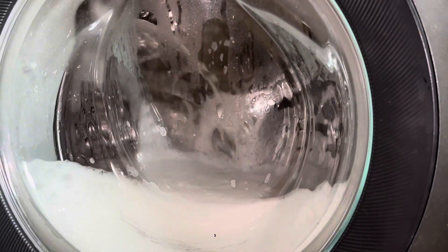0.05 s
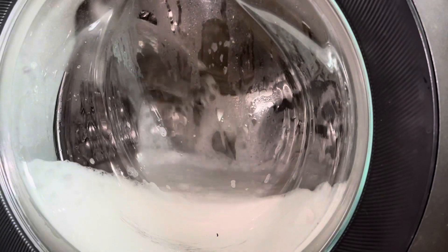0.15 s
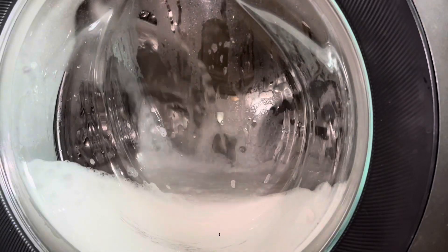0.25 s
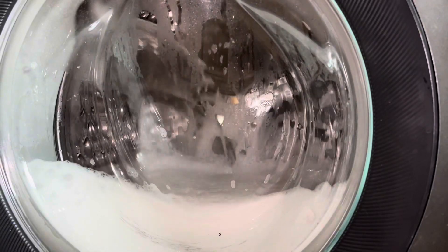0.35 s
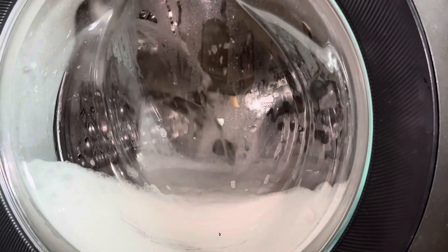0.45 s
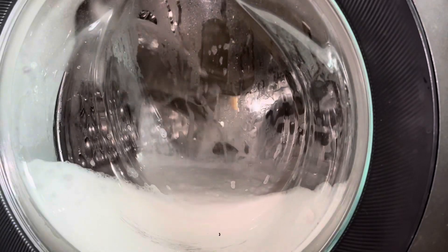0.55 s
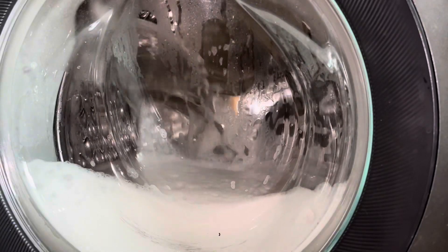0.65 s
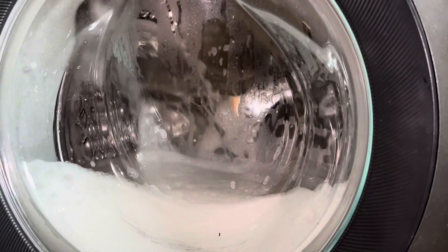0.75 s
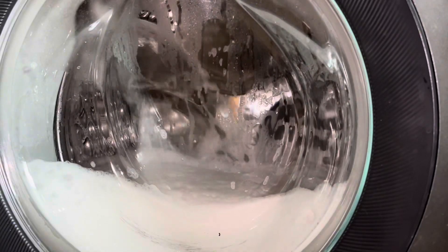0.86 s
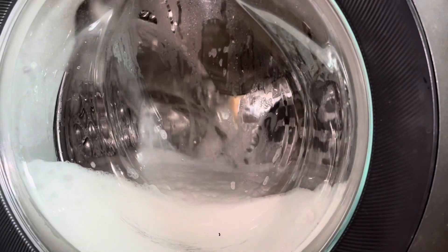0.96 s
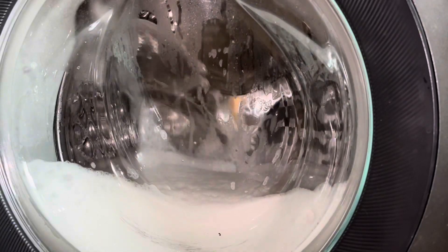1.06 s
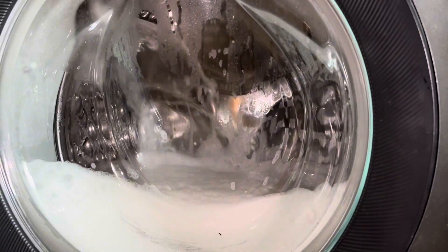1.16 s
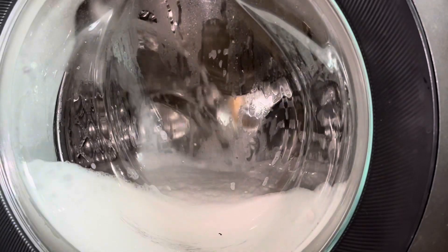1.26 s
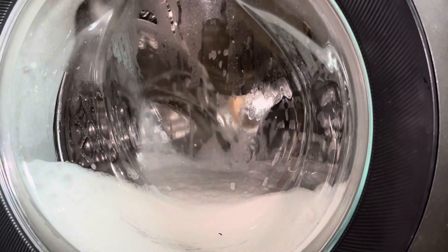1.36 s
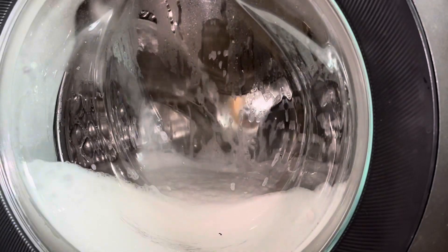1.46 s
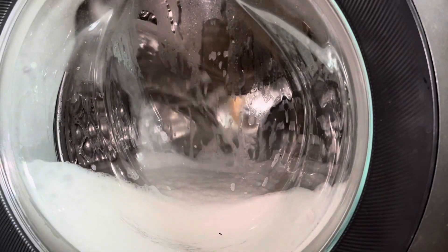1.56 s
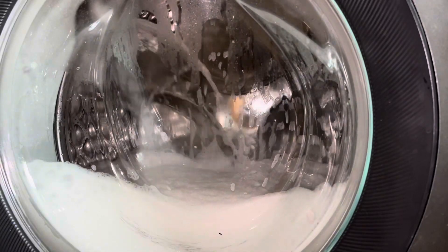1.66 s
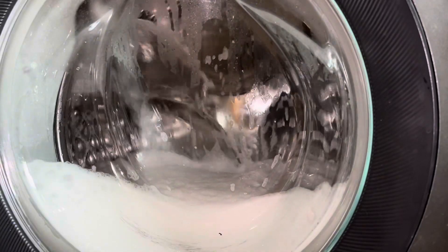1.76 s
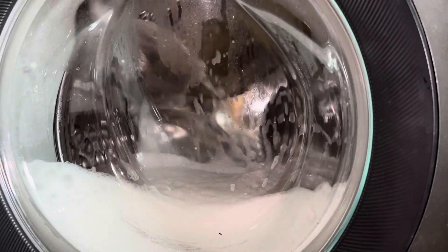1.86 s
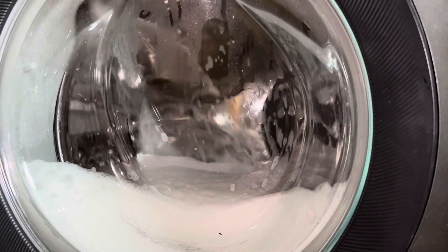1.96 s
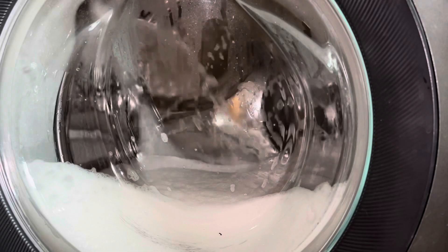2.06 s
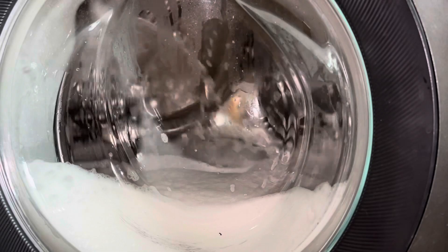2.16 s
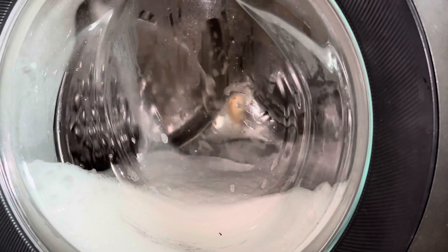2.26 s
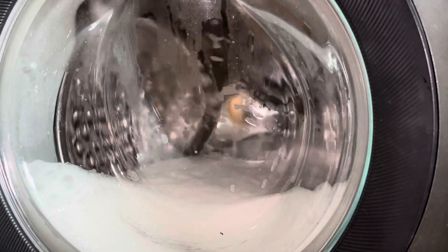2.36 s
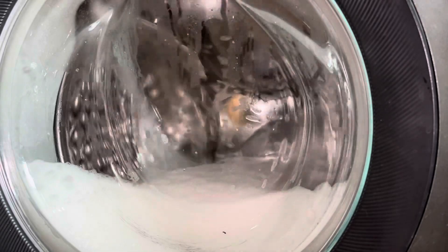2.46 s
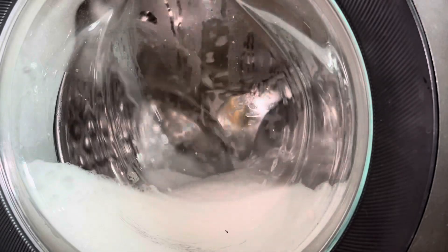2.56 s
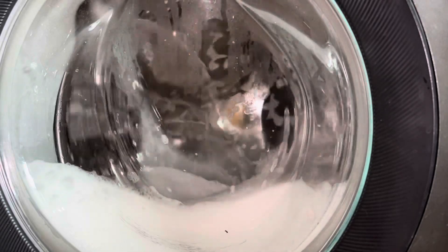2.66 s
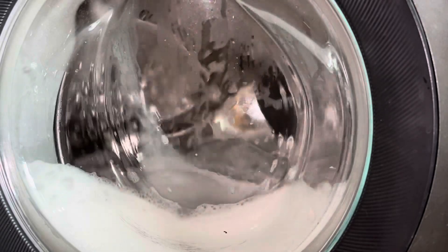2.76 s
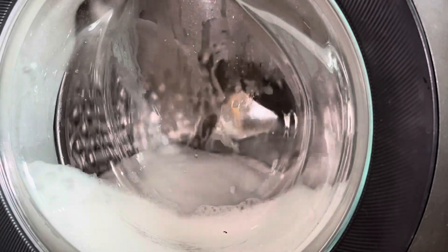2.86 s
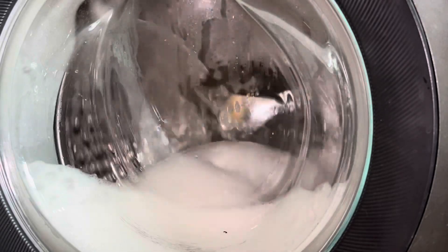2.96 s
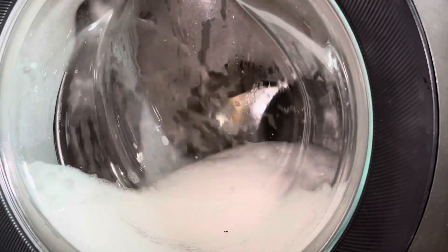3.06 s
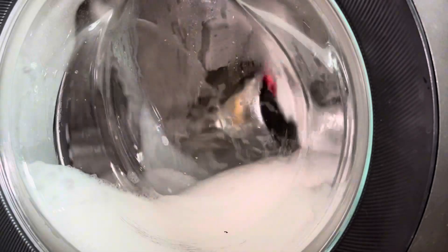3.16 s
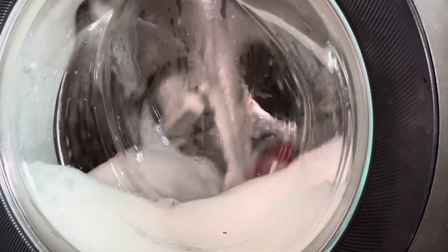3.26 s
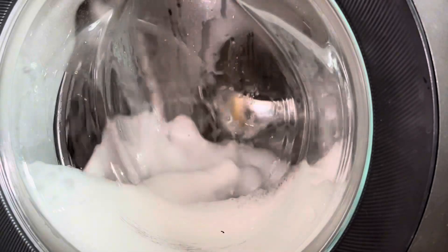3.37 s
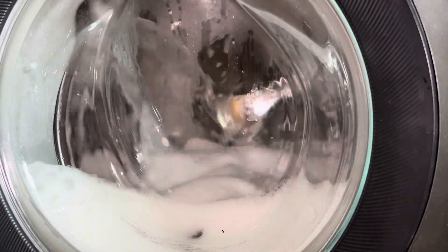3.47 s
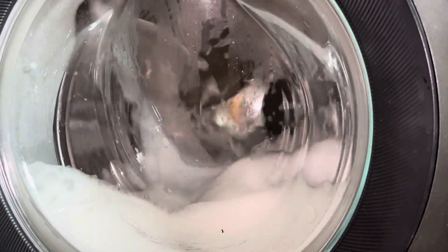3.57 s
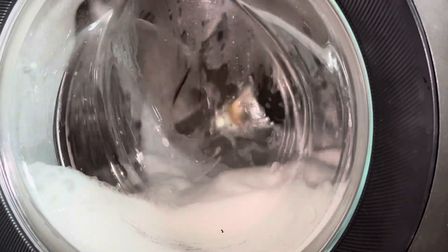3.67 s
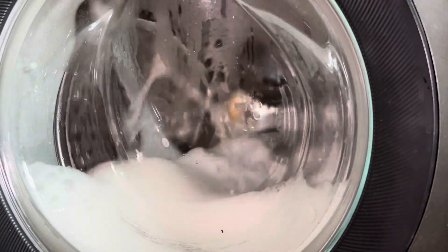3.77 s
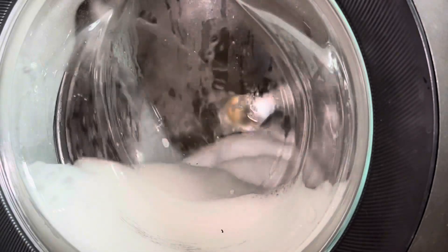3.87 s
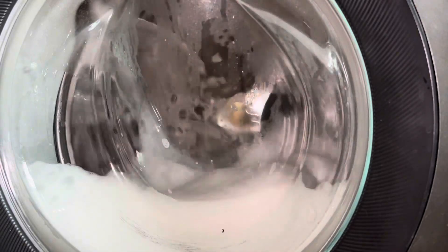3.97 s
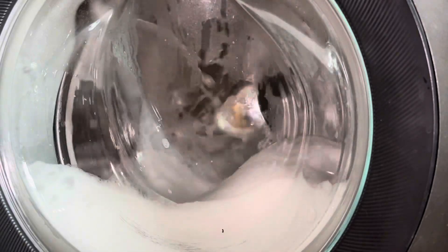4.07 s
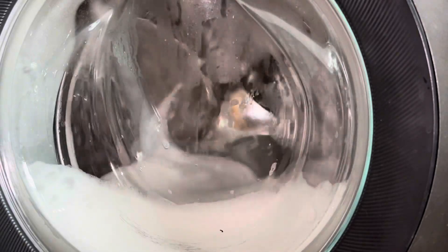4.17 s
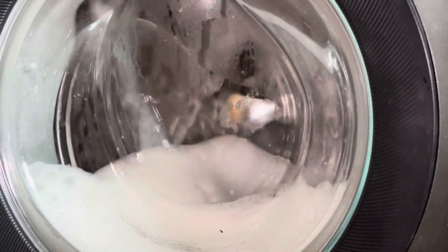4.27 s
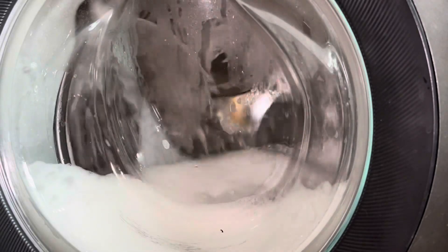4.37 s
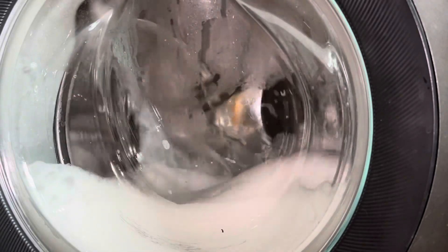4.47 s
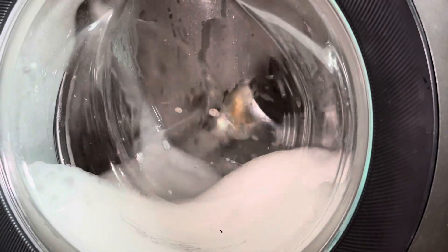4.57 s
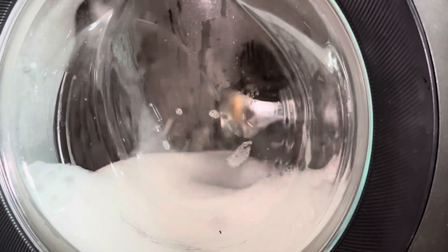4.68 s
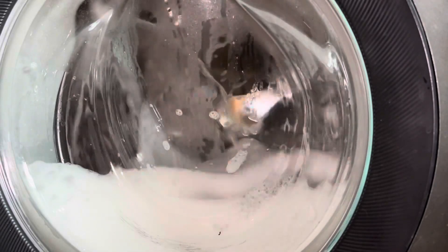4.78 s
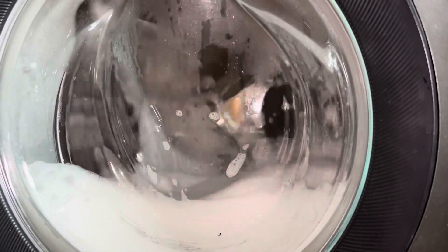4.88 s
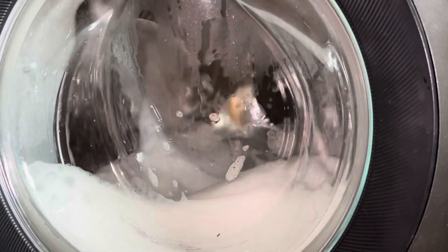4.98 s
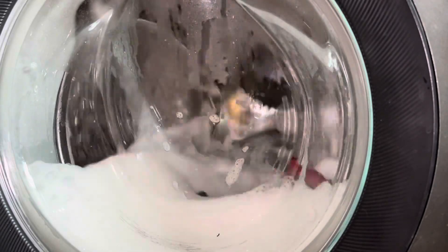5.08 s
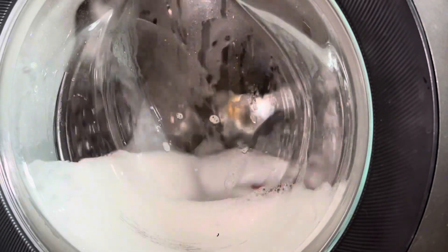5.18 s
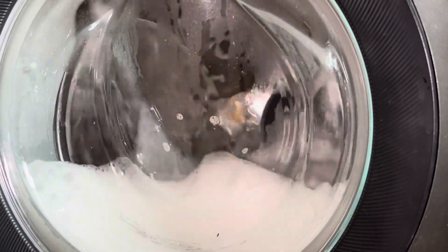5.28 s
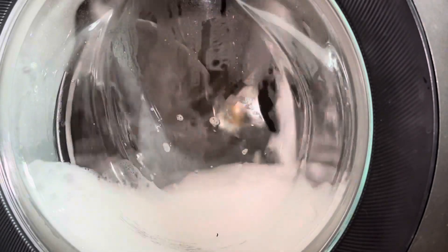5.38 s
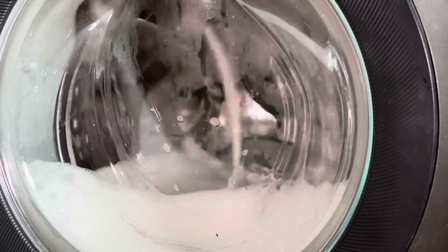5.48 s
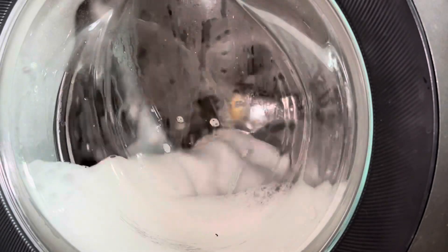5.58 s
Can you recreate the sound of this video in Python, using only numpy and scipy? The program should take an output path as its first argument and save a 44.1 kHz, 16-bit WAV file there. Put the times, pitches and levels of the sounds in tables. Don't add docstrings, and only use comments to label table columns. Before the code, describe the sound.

Low motor hum and tiny bubble chirps give way to irregular hollow metallic knocks, scrapes and dull bounces inside a sloshing washing machine drum.

```python
import sys
import numpy as np
from scipy import signal
from scipy.fft import rfft, irfft
from scipy.io import wavfile
from scipy.ndimage import uniform_filter1d

SR = 44100
rng = np.random.default_rng(int(sys.argv[2]) if len(sys.argv) > 2 else 0)


def volts_from_decibels(level):
    exponent = np.asarray(level, float) / 20
    return 10 ** exponent


def materialize(psi):
    bounded = np.clip(np.atleast_2d(psi).T, -1, 1)
    quanta = np.round(bounded * 32767).astype(np.int16)
    wavfile.write(sys.argv[1], SR, quanta)


N = 248283

# t/s, peak level/dB, bass share/dB, treble share/dB, strongest ring f/Hz
KNOCKS = [(2.468, -31, -9, -16.5, 300), (2.656, -32, -10.5, -21, 410), (2.711, -34.5, -6, -29, 294),
          (3.093, -29.5, -21, -20, 361), (3.241, -24, -2.5, -20.5, 463), (3.378, -23, 15.5, -8, 450),
          (3.807, -15, -16.5, -19, 466), (3.849, -28.5, 4.5, -13, 509), (3.933, -24, -3, -10, 310),
          (4.217, -19, -8.5, -14.5, 610), (4.337, -29.5, -33, -26, 476), (4.844, -22, -1, -56, 408),
          (4.926, -32, -2, -22.5, 450), (5.082, -15, -9, -30.5, 270), (5.334, -32, 6.5, -18.5, 202),
          (5.454, -28.5, -6.5, -29, 336), (5.579, -27, -9, -24, 436)]
# t/s, peak level/dB, treble share/dB, strongest ring f/Hz
SLIDES = [(2.017, -35.5, -23.5, 346), (2.191, -40.5, -12, 342), (2.274, -36.5, -16.5, 336),
          (2.535, -25, -19.5, 620), (2.717, -31, -18.5, 304), (2.78, -41, -7.5, 206),
          (3.157, -37, -9.5, 301), (3.363, -20, -32, 408), (3.718, -21, -26.5, 448), (4.706, -35, -6, 433),
          (4.806, -22.5, -24.5, 633), (5.501, -37.5, -11, 400), (3.541, -38.5, -13.5, 412),
          (3.6, -45, -4.5, 250)]
# t/s, peak level/dB, treble share/dB
RAPS = [
    (4.004, -35.5, -5),
    (4.039, -32, -15.5),
    (4.532, -19.5, -17.5),
    (5.539, -23, -22.5),
]
# t/s, peak level/dB, bass share/dB
BOUNCES = [(2.169, -42, -8), (2.418, -37, -14), (2.588, -35, -16), (2.949, -38.5, -14), (3.428, -27.5, 18),
           (3.498, -45.5, 1), (4.103, -36, -7), (4.382, -33.5, 2), (4.594, -37.5, 16), (5.02, -38.5, -34),
           (5.138, -39, -7), (5.189, -46, 18), (4.826, -27, -8), (5.562, -33, -10)]
# t/s, peak level/dB, share above 3.5 kHz/dB
TICKS = [(2.531, -30, -40), (2.651, -36.5, -40), (3.087, -35, -45), (3.2362, -32, -16), (3.358, -36, -26),
         (3.8054, -19, -44), (3.93, -28, -47), (4.007, -30, -34), (4.044, -27, -45), (4.215, -24, -31.5),
         (4.334, -36.5, -45), (4.532, -22.5, -18.5), (4.708, -43, -14), (4.806, -32, -28),
         (5.0787, -36.5, -19), (5.536, -31, -28)]
# t/s, peak level/dB, share above 3.5 kHz/dB
SPLASHES = [
    (3.368, -34.5, -20),
    (3.392, -41, -21.5),
    (4.713, -47, -15),
    (5.544, -37, -21),
    (5.575, -41.5, -21),
]
# t/s, peak level/dB
THUDS = [(2.064, -60), (2.134, -57), (2.364, -62), (2.457, -66), (2.564, -56), (2.713, -61), (2.819, -63),
         (3.023, -46.5), (3.255, -50), (3.388, -49.5), (3.459, -49.5), (3.638, -52.5), (3.823, -44.5),
         (3.869, -44.5), (3.95, -41.5), (4.065, -51), (4.232, -46.5), (4.422, -48.5), (4.527, -51.5),
         (4.599, -54), (4.696, -54), (4.826, -49), (5.091, -45.5), (5.219, -64), (5.344, -45.5),
         (5.418, -55), (5.531, -46)]
# t/s, peak level/dB, f/Hz
DRIPS = [(0.0373, -58, 3330), (0.1256, -57, 3530), (0.416, -59, 3500), (0.4963, -58, 3600),
         (0.5267, -57, 3650), (0.6265, -56, 3630), (0.7223, -62, 3650), (1.134, -66, 3700),
         (2.0157, -67, 3700), (2.2822, -65, 3750), (2.4144, -62, 3200), (2.795, -71, 3390),
         (2.918, -69, 6350), (2.9806, -65, 3580)]
# t/s, trickle level/dB
FLOW = [(0.0, -68), (0.5, -72.5), (0.92, -75.5), (1.63, -81), (2.8, -81.5), (3.6, -83.5), (3.9, -72),
        (4.1, -76), (4.7, -73.5), (5.43, -67.5), (5.63, -66.5)]
# f/Hz, level/dB, t60/s
DRUM = [(181.4, -2.5, 0.21), (198, -8, 0.081), (248.3, 2, 0.18), (299, 1, 0.23), (323, -2.5, 0.096),
        (412, 7.5, 0.099), (466, -8, 0.85), (530, 0.5, 0.032), (556, -2.5, 0.049), (630, -7.5, 0.089),
        (660.8, -3.5, 0.2), (712, -16.5, 0.42), (819, 1, 0.1), (894, -2.5, 0.058), (951, -3, 0.1),
        (1040, -12, 0.055), (1210, -14.5, 0.03), (1409, -6, 0.067), (1428, -23, 0.12), (1564, -8, 0.087),
        (1744, -25.5, 0.26), (2009, -27, 0.077), (2355, -17, 0.053), (2530, -50.5, .08), (3070, -25, 0.038)]
# f/Hz, density/dB per Hz
CRACK = [(71, -39), (120, -8), (432, 4.5), (726, 1.5), (1080, -10.5), (1530, -18), (1660, -30.5),
         (1880, -17.5), (2800, -34.5), (4160, -40), (7500, -66), (9750, -92.5), (16500, -120)]
# f/Hz, density/dB per Hz
EDGE = [(500, -34), (900, 5.5), (1400, 0), (2400, -11), (3300, -14.5), (4800, -11), (6500, -27),
        (7600, -50.5), (9200, -64.5), (10000, -42.5), (14000, -46), (14600, -80.5)]
# f/Hz, t60/s
ROOM = [(60, 0.84), (200, 0.23), (500, 0.39), (1500, 0.42), (4000, 0.62), (8000, 0.16)]
# f/Hz, density/dB per Hz
SLOSH = [(15, -62), (30, -41.5), (48, -1), (70, -1), (90, -10), (150, -10), (240, -16.5), (295, -11),
         (345, -12), (498, -16.5), (694, -20.5), (1940, -38.5), (2600, -48.5), (3400, -68.5)]
# f/Hz, density/dB per Hz
TRICKLE = [(900, -28.5), (1500, -6.5), (1900, 0.5), (2400, -4), (3250, -0.5), (3550, 2.5), (3900, -3),
           (5200, -4), (6200, -16.5), (7300, -14.5), (7800, -35.5), (10000, -50)]
# f/Hz, density/dB per Hz
AIR = [(3500, -26), (6000, -4), (7400, -10.5), (7800, -31), (9100, -22), (9700, -5.5), (13900, -8),
       (14500, -30.5), (15300, -28), (16000, -59)]
# f/Hz, side minus mid level/dB
WIDE = [(60, -18.5), (110, -14.5), (200, 1), (370, -6), (690, -1.5), (1260, -1), (2320, -5.5), (4260, -2),
        (6500, -1), (7600, 7.5), (7900, 14), (9100, 15.5), (10300, -21), (13400, -17), (14400, 10.5)]
# f/Hz, level/dB, wavering/Hz
HUM = [(98.8, -52.5, 0.21), (149.8, -65, 9), (200.3, -57.5, 0.27), (295.7, -59.5, 8.88), (355, -82, 5.8),
       (498, -66.5, 8), (634, -73, 5.86)]
# t/s, f/Hz, level/dB
WHINE = (1.6, 9981, -99)

KNOCK_S, SLIDE_S, RAP_S, BOUNCE_S = 0.014, 0.023, 0.0038, 0.011
TICK_S, SPLASH_S = 0.0066, 0.018
SLIDE_BASS_DB, RAP_BASS_DB, BOUNCE_TREBLE_DB = -7, -10.5, -27
RAP_RING_HZ, BOUNCE_RING_HZ = 420, 380
TUB_HZ, TUB_SCATTER = 65.3, 0.096
SLOSH_DB, AIR_DB = -51, -87.5
TURN_FROM_S, TURN_FULL_S = 2.6, 3.7
SLOSH_TURN_DB, AIR_TURN_DB, AIR_PER_FLOW = 3, 3, 0.25
CHURN_S, CHURN_SLOSH_DB, CHURN_AIR_DB = 0.11, -18, -60


def evened(x):
    return x / np.sqrt(np.mean(x ** 2) + 1e-20)


def read(points, hz):
    f, value = np.transpose(points)
    return np.interp(np.log(hz + 1), np.log(f + 1), value)


def add(mix, s, sound):
    part = mix[..., round(s * SR):][..., :sound.shape[-1]]
    part += sound[..., :part.shape[-1]]


def rise(t, length_s):
    return np.sin(np.minimum(t / length_s, 1) * np.pi / 2)


def blow_colour_db(f, bass_db, treble_db, ring_hz, contact_s):
    bass = (bass_db + 11.5) / (1 + (f / 300) ** 4)
    treble = (treble_db + 27) / (1 + (1300 / (f + 1)) ** 3)
    hard = -3 * np.log(contact_s / 0.011) * np.log(1 + np.minimum(f, 5500) / 2000)
    ring = 4 * np.exp(-(np.log(f / ring_hz + 1e-9) / 0.4) ** 2)
    return bass + treble + hard + ring


def contact_force(contact_s):
    t = np.arange(4000) / SR
    grit = rng.random((2, 4000))
    force = (grit[0] < 0.05) * (grit[1] - 0.5)
    force *= np.minimum(t / (0.26 * contact_s), 1) * np.exp(-t / contact_s)
    force[30] += 0.0033 / contact_s
    return force


def drum_rings(colour):
    t = np.arange(8000) / SR
    hz, mode_db, t60 = np.transpose(DRUM)[..., None]
    spot = rng.standard_normal((2, len(DRUM), 3))
    spot = 0.63 * spot[0] + 0.84 * spot
    level_db = mode_db + colour(hz) + 2 * spot[:, :, :1]
    detune = 1 + 0.0086 * spot[0, :, 1:2]
    phase = 0.97 * np.clip(hz / 900, 0, 1.5) * spot[:, :, 2:]
    swing = np.sin(2 * np.pi * hz * t * detune + phase)
    dying = volts_from_decibels(-60 * t / (0.33 * t60)) + 0.09 * volts_from_decibels(-60 * t / (1.7 * t60))
    return (volts_from_decibels(level_db) * dying * swing).sum(1) * rise(t, 0.0014) ** 2


def water_slap(colour, contact_s):
    t, hz = np.arange(4000) / SR, np.fft.rfftfreq(4000, 1 / SR)
    snap = rng.standard_normal((2, 4000))
    left_db = 4.7 / (1 + (2000 / (hz + 1)) ** 2) * np.array([[1], [-1]])
    spectrum = rfft(0.5 * snap[0] + 0.58 * snap) * volts_from_decibels(read(CRACK, hz) + colour(hz) + left_db)
    fading = np.exp(-0.8 * t / contact_s) + 0.22 * np.exp(-t / 0.031)
    fading *= np.cos(t * SR / 8000 * np.pi)
    return volts_from_decibels(-7.5) * evened(irfft(spectrum, 4000)) * rise(t, 0.19 * contact_s) ** 2 * fading


def knock(db, bass_db, treble_db, ring_hz, contact_s):
    contact_s = np.clip(contact_s, 0.001, 0.05)

    def colour(f):
        return blow_colour_db(f, bass_db, treble_db, ring_hz, contact_s)

    body = signal.fftconvolve(drum_rings(colour), contact_force(contact_s)[None], axes=1)
    body /= abs(body.mean(0)).max()
    body[:, :4000] += water_slap(colour, contact_s)
    return volts_from_decibels(db - 1) * body * volts_from_decibels([[-0.6], [0.6]])


def tick(db, top_db, length_s):
    t, hz = np.arange(2048) / SR, np.fft.rfftfreq(2048, 1 / SR)
    snap = rng.standard_normal((2, 2048))
    colour_db = read(EDGE, hz) + (top_db + 12.5) / (1 + (3300 / (hz + 1)) ** 6)
    crackle = evened(irfft(rfft(1.1 * snap[0] + 0.31 * snap) * volts_from_decibels(colour_db), 2048))
    fading = np.exp(-t / np.clip(length_s, 0.001, 0.02)) + 0.097 * np.exp(-t / 0.028)
    envelope = np.minimum(t / 0.0012, 1) ** 2 * fading * np.cos(t / t[-1] * np.pi / 2)
    return volts_from_decibels(db - 11.5) * crackle * envelope * volts_from_decibels([[3.5], [-3.5]])


def blows():
    out = np.zeros((2, N))
    hits = [(*row, KNOCK_S) for row in KNOCKS]
    hits += [(s, db, SLIDE_BASS_DB, treble_db, hz, SLIDE_S) for s, db, treble_db, hz in SLIDES]
    hits += [(s, db, RAP_BASS_DB, treble_db, RAP_RING_HZ, RAP_S) for s, db, treble_db in RAPS]
    hits += [(s, db, bass_db, BOUNCE_TREBLE_DB, BOUNCE_RING_HZ, BOUNCE_S) for s, db, bass_db in BOUNCES]
    for s, *row in hits:
        add(out, s - 0.0025, knock(*row))
    for s, *row in TICKS:
        add(out, s - 0.0015, tick(*row, TICK_S))
    for s, *row in SPLASHES:
        add(out, s, tick(*row, SPLASH_S))
    return out


def room(x):
    taps = np.zeros((2, SR // 2))
    at = np.arange(300, SR // 2 - 20, 20)
    at = at + rng.integers(0, 20, (2, len(at)))
    np.put_along_axis(taps, at, rng.choice([-1., 1.], at.shape), 1)
    hz, t, z = signal.stft(taps, SR, nperseg=512)
    same = 0.9 / (1 + (hz[:, None] / 350) ** 2)
    z = same * z[0] + np.sqrt(1 - same ** 2) * z
    z *= volts_from_decibels(-60 * t / read(ROOM, hz)[:, None])
    tail = signal.istft(z, SR, nperseg=512)[1]
    return signal.fftconvolve(x, tail / np.linalg.norm(tail[0]), axes=1)[:, :N]


def thud(db, hz):
    t = np.arange(16000) / SR
    envelope = (1 - np.exp(-(t / 0.016) ** 2)) * volts_from_decibels(-60 * t / 0.32)
    return volts_from_decibels(db + 16.5) * envelope * np.sin(2 * np.pi * hz * t)


def tub():
    out = np.zeros(N)
    for (s, db), chance in zip(THUDS, rng.standard_normal(len(THUDS))):
        add(out, s - 0.015, thud(db, TUB_HZ * (1 + TUB_SCATTER * chance)))
    return out


def hiss(spectrum, patchy_db, flicker_db):
    frames, hz = N // 256 + 5, np.fft.rfftfreq(1024, 1 / SR)
    a, b, c, d, patches = rng.standard_normal((frames, 513, 5)).T
    patches = uniform_filter1d(patches, size=8, axis=0)
    patches = evened(uniform_filter1d(patches, size=10, axis=1))
    flicker = evened(uniform_filter1d(rng.standard_normal(frames), size=3))
    z = np.array([a + 1j * b, (c + 1j * d) * volts_from_decibels(read(WIDE, hz))[:, None]])
    z *= volts_from_decibels(read(spectrum, hz)[:, None] + patchy_db * patches + flicker_db * flicker)
    mid, side = signal.istft(z, nperseg=1024, noverlap=768)[1][:, :N]
    return np.array([mid + side, mid - side]) / np.sqrt(np.mean(mid ** 2))


def stirred(db, churn, churn_db):
    return np.sqrt(volts_from_decibels(db) ** 2 + churn * volts_from_decibels(churn_db) ** 2)


def water(knocks):
    t = np.arange(N) / SR
    trickle_db = np.interp(t, *np.transpose(FLOW))
    turn = np.clip((t - TURN_FROM_S) / (TURN_FULL_S - TURN_FROM_S), 0, 1)
    keep = np.exp(-1 / (CHURN_S * SR))
    churn = abs(signal.lfilter([(1 - keep) ** 2], [1, -2 * keep, keep ** 2], knocks.mean(0) ** 2))
    slosh_gain = stirred(SLOSH_DB + SLOSH_TURN_DB * turn, churn, CHURN_SLOSH_DB)
    air_db = AIR_DB + AIR_TURN_DB * turn + AIR_PER_FLOW * (trickle_db - trickle_db.min())
    air_gain = stirred(air_db, churn, CHURN_AIR_DB)
    slosh = slosh_gain * volts_from_decibels(-1.5) * hiss(SLOSH, patchy_db=1.5, flicker_db=-1.07)
    trickle = volts_from_decibels(trickle_db - 1.5) * hiss(TRICKLE, patchy_db=2.5, flicker_db=0.5)
    air = air_gain * hiss(AIR, patchy_db=2.2, flicker_db=0.7)
    return slosh + trickle + air


def drip(db, hz):
    t = np.arange(1200) / SR
    envelope = (1 - np.exp(-t / 0.006)) * np.exp(-t / 0.0056)
    bubble = np.sin(2 * np.pi * hz * t * (1 + 1.4 * t)) * envelope
    return volts_from_decibels(db + 1.5) * bubble * volts_from_decibels([[1.5], [-1.5]])


def wander():
    return evened(uniform_filter1d(rng.standard_normal(N), size=4000))


def hum():
    t, out = np.arange(N) / SR, np.zeros(N)
    for hz, db, waver_hz in HUM:
        turns = hz * t + np.cumsum(wander() * waver_hz) / SR + rng.random()
        out += volts_from_decibels(db) * np.sqrt(2) * np.sin(2 * np.pi * turns)
    return out


def whine():
    t = np.arange(N) / SR
    s, hz, db = WHINE
    return volts_from_decibels(db) * np.clip((t - s) / 0.1, 0, 1) * np.sin(2 * np.pi * hz * t + 1.5 * wander())


def scene():
    knocks = blows()
    wet = volts_from_decibels(-9.5) * room(knocks)
    steady = water(knocks) + hum() + whine()
    for s, *row in DRIPS:
        add(steady, max(s - 0.002, 0), drip(*row))
    return knocks + wet + tub() + steady


def band_limit(x):
    return signal.sosfilt(signal.butter(12, 15000, fs=SR, output="sos"), x)


def record(dry):
    cut = signal.sosfilt(signal.butter(3, 45, "high", fs=SR, output="sos"), dry)
    cut *= np.minimum(np.arange(N)[::-1] / 200, 1)
    return band_limit(cut)


dry = scene()
out = record(dry)
materialize(out)
```